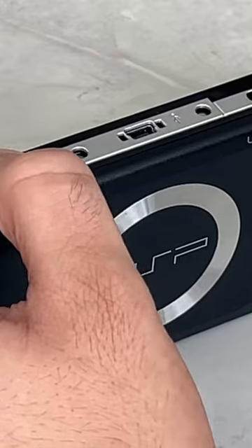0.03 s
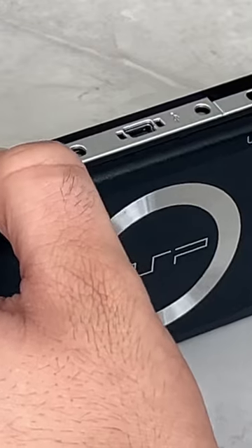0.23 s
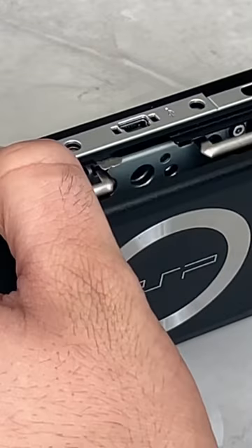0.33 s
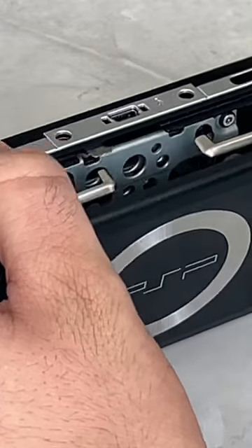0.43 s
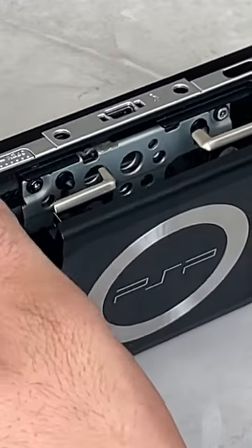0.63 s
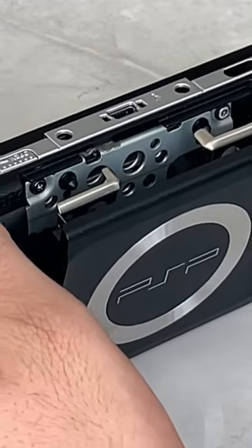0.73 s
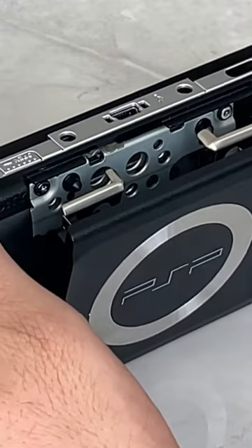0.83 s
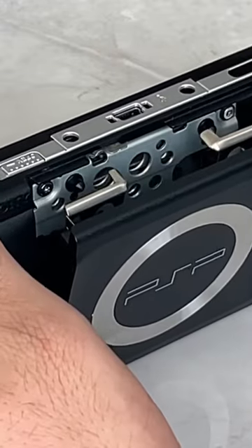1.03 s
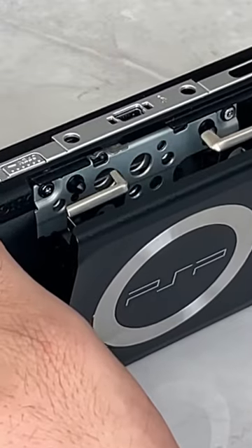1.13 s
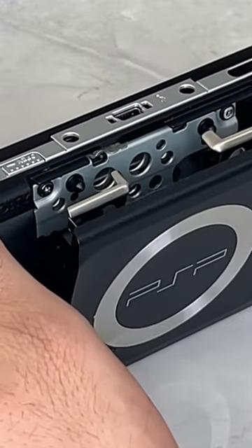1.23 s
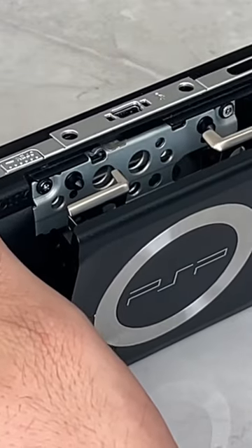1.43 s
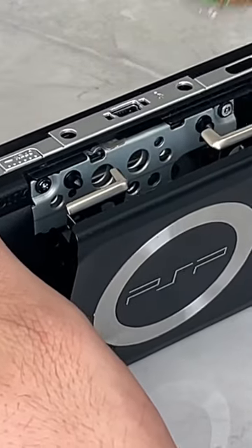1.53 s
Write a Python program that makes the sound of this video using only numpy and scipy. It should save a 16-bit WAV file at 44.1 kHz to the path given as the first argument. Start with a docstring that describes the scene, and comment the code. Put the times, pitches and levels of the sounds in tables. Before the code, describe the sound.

A handheld console's plastic disc door clicks open, close by in a small, live room. A soft thumb scuff at 0.1 seconds leads to the catch cracking free at about 0.2, with a quick clatter and light thuds. The door snaps sharply against its stop at 0.4. From 0.9 to 1.5 seconds, loose parts tick and rub faintly with a slight metallic ring, over a low room rumble.

```python
"""Unlatching a console's disc door

Close by in a small, live room, a faint dull sound dies away, then a thumb scuffs the slider of a handheld
console and the catch cracks free. The sprung plastic door chatters and thuds as it swings out, then snaps
against its stop; these impacts excite the damped modes of panel, case and stop. Afterwards loose parts
tick and rub as the hand shifts the case, ringing the metal disc holder, over a low room rumble."""
import sys
import numpy as np
from scipy import signal
from scipy.fft import rfft, irfft
from scipy.io import wavfile

SR = 44100
rng = np.random.default_rng(int(sys.argv[2]) if len(sys.argv) > 2 else 0)


def transcribe(signal):
    """Save signal, clipped to [-1, 1], as a 16-bit WAV file at the path in sys.argv[1]."""
    frames = np.atleast_2d(signal).T
    limited = np.clip(frames, -1, 1)
    pcm = np.round(limited * 32767).astype(np.int16)
    wavfile.write(sys.argv[1], SR, pcm)


N = 70560
T = np.arange(N) / SR
HZ = np.maximum(np.fft.rfftfreq(2 * N, 1 / SR), 1)

# modes of the door panel: (frequency [Hz], level [dB], t60 [s])
PANEL_MODES = [(536, -31, .22), (902, -26.5, 0.13), (1103, -25, 0.027), (1143.6, -30.5, 0.15),
               (1442, -28.5, .19), (1482, -31, .12), (1648, -33.5, .22), (1906, -39.5, 0.11),
               (2102, -42.5, 0.6), (2680, -36.5, 0.12), (2870, -27, 0.049), (4800, -27, 0.027),
               (8080, -22, 0.045)]


def from_db(db):
    """Amplitude ratio of a level in decibels."""
    return 10 ** (np.asarray(db) / 20)


def at_hz(table, hz, column=1):
    """Interpolation of a table column on a log-frequency axis."""
    table = np.array(table)
    return np.interp(np.log(hz), np.log(table[:, 0]), table[:, column])


def colour(x, spectrum):
    """Minimum-phase filter: folding the cepstrum onto positive time makes the response causal."""
    cepstrum = irfft(np.log(from_db(at_hz(spectrum, HZ))))
    cepstrum[1:N] *= 2
    cepstrum[N + 1:] = 0
    return irfft(rfft(x, 2 * N) * np.exp(rfft(cepstrum)))[..., :N]


def soften(x, hz, order=1):
    """Low-pass filter: the softer a contact, the lower its cutoff."""
    return signal.sosfilt(signal.butter(order, hz, fs=SR, output="sos"), x + 1e-18)


def centred(x, hz, spread=1.144):
    """Band-pass filter: a small contact has its energy around one pitch."""
    band = signal.butter(1, [hz / spread, hz * spread], "band", fs=SR, output="sos")
    return signal.sosfilt(band, x + 1e-18)


def ring(force, modes):
    """Modal superposition: each mode answers the force as a damped oscillator."""
    out = np.zeros(N)
    for hz, db, t60 in modes:
        radius, angle = from_db(-60 / (t60 * SR)), 2 * np.pi * hz / SR
        feedback = [1, -2 * radius * np.cos(angle), radius * radius]
        out += from_db(db) * signal.lfilter([0, np.sin(angle)], feedback, force + 1e-18)
    return out


def decay(start, t60):
    """Exponential decay from a sudden onset, falling 60 dB in t60 seconds."""
    return (T >= start) * np.exp(-np.log(1000) * np.clip((T - start) / t60, 0, 10))


def impulses(rows):
    """Ideal impacts: one impulse for each time and level."""
    out = np.zeros(N)
    for start, db in rows:
        out[int(start * SR)] += from_db(db)
    return out


def contacts(rows, t60, grit):
    """Rough impacts: each is an impulse and a decaying crunch of noise, low-passed together."""
    out = np.zeros(N)
    for start, db, hz in rows:
        crunch = from_db(db) * grit * decay(start, t60) * rng.standard_normal(N)
        out += soften(impulses([(start, db)]) + crunch, hz)
    return out


def grains(per_s):
    """Shot noise: tiny impacts of random time and size."""
    return (rng.random(N) < per_s / SR) * rng.standard_normal(N)


def stereo_noise(coherence):
    """Partly coherent white noise: the mid-side balance sets how alike left and right are."""
    mid, side = rfft(rng.standard_normal((2, 2 * N)))
    common = np.sqrt((1 + coherence) / 2) * mid
    opposed = np.sqrt((1 - coherence) / 2) * side * [[1], [-1]]
    return irfft(common + opposed)[:, :N]


def room_rumble():
    """Stationary background noise: a low rumble with a faint hiss."""
    # noise spectrum: (frequency [Hz], relative level [dB])
    spectrum = [(25, -6), (50, -3.5), (90, 4), (125, -3), (170, -12.5), (300, -16.5), (600, -20.5),
                (1000, -34), (1700, -47), (4000, -52), (8500, -56.5), (10500, -56.5), (12500, -65.5),
                (14000, -69), (16000, -64)]
    # likeness of left and right: (frequency [Hz], coherence [0-1])
    coherence = [(60, 1), (130, 0.94), (300, 0.66), (700, 0), (3000, 1)]
    noise = colour(stereo_noise(at_hz(coherence, HZ)), spectrum)
    noise = soften(noise, hz=13200, order=8)
    return from_db(-50.5) * noise / noise.std()


def dull_sound_and_scuffs():
    """Low-passed bursts: a faint dull sound dies away at the start, then the thumb scuffs the slider."""
    # the opening dull sound, then the thumb's scuffs: (time [s], level [dB], cutoff [Hz])
    bursts = [(.002, -47.5, 1800), (.0885, -46.5, 1760), (.099, -41, 907), (.1045, -42.5, 900),
              (.110, -44, 593)]
    # response to a burst: (frequency [Hz], gain [dB])
    response = [(60, -4), (300, 16), (500, 1.5), (1400, 2), (2500, -11.5), (5000, -9.5), (12000, -23)]
    return colour(contacts(bursts, t60=0.043, grit=0.95), response)


def catch_release():
    """Impact excitation: knocks and dying chatter sound through the door; the knocks ring its panel."""
    # the catch lets go and the door knocks in its guides: (time [s], level [dB], cutoff [Hz])
    knocks = [(0.2218, -31.5, 1000), (0.228, -19, 14000), (.2294, -18, 6000), (.2346, -16, 2870),
              (.2392, -24.5, 14000), (.2418, -27.5, 12000), (0.2509, -18.5, 3030), (.2642, -23, 6000),
              (0.2853, -28.5, 4000), (.2885, -28.5, 4500), (0.2961, -34, 4000), (.3025, -38, 14000),
              (0.3197, -28.5, 1800), (.3335, -39, 12000), (.3550, -35, 2800), (0.395, -36, 2800)]
    # response of the door to a knock: (frequency [Hz], gain [dB])
    response = [(30, -27), (100, -5), (350, 7), (700, 4.5), (1150, 15), (1650, 12), (2200, 6), (3100, 11),
                (5000, 4.5), (8000, 7.5), (10000, 5), (13000, 2.5), (15500, 7)]
    chatter = from_db(-26) * decay(start=0.231, t60=0.27) * grains(per_s=1200)
    clatter = colour(contacts(knocks, t60=0.017, grit=0.31) + chatter, response)
    force = sum(soften(impulses([(start, db)]), hz) for start, db, hz in knocks)
    return clatter + ring(force, PANEL_MODES)


def case_thuds():
    """Soft blows drive the low modes of the case; the deep bass beneath them is cut away."""
    # the swinging door shakes the case: (time [s], level [dB])
    blows = [(.2408, -35.5), (.2455, -30.5), (.2498, -30.5), (.2636, -29), (.2702, -33.5), (.2945, -33.5)]
    # modes of the case: (frequency [Hz], level [dB], t60 [s])
    modes = [(172, -4, 0.1), (199, -12.5, 0.23), (229.8, -5.5, 0.06), (267.6, -6, 0.078), (346.6, -17, .15),
             (424, -22.5, 0.28)]
    vibration = ring(soften(impulses(blows), hz=600), modes)
    bass_cut = signal.butter(2, 120, "high", fs=SR, output="sos")
    return signal.sosfilt(bass_cut, vibration)


def door_stop():
    """A hard impact is broadband: returns the crack with the panel's ring, and the stop's brief ring."""
    # the door meets its stop and rebounds: (time [s], level [dB])
    impacts = [(.4182, -30.5), (.4191, -20), (.4199, -32.5), (.4262, -32)]
    # spectrum of the crack: (frequency [Hz], gain [dB])
    spectrum = [(100, -25), (600, -15.5), (1000, -17.5), (1650, 4), (2200, -1.5), (3300, 1.5), (5000, 1),
                (7600, 2), (10000, 1.5), (13000, -7), (15500, -1.5)]
    # modes of the stiff parts at the stop: (frequency [Hz], level [dB], t60 [s])
    stop_modes = [(1510, -50, .02), (2550, -45.5, .008), (3450, -11.5, .009), (4100, -25.5, .004),
                  (5010, -19, .006), (6220, -6, .004), (7120, -9.5, 0.015), (7220, -7, .005),
                  (8850, -14, .007), (10920, -1, .005), (11700, -19, .004), (15400, -4.5, .004)]
    envelope = sum(from_db(db - 4.5) * decay(start, t60=0.016) for start, db in impacts)
    crack = colour(envelope * rng.standard_normal(N), spectrum)
    force = impulses(impacts)
    panel = from_db(-10) * ring(force, PANEL_MODES)
    return crack + panel, ring(force, stop_modes)


def tick(start, db, hz, t60, rise_s=0.0022):
    """A light impact: a decaying burst of band-limited noise with a soft onset."""
    onset = np.clip((T - start) / rise_s, 0, 1)
    return centred(from_db(db) * onset * decay(start, t60) * rng.standard_normal(N), hz)


def rub(start, duration, db, hz):
    """Sliding friction: a swell of tiny random impacts."""
    swell = np.sin(np.pi * np.clip((T - start) / duration, 0, 1))
    return centred(from_db(db) * swell * grains(per_s=1700), hz)


def loose_parts():
    """Forced vibration: ticks and rubs sound directly and through the disc holder's resonances."""
    # loose parts tick in the hand: (time [s], level [dB], centre frequency [Hz], t60 [s])
    ticks = [(0.9106, -56.5, 3020, 0.031), (0.9155, -53.5, 9150, 0.016), (0.932, -64, 2930, 0.038),
             (0.965, -62.5, 3100, 0.014), (0.983, -59, 2800, 0.0096), (1.064, -61.5, 8040, 0.018),
             (1.071, -58.5, 8100, 0.015), (1.129, -51, 5830, 0.018), (1.149, -63, 6400, 0.0092),
             (1.183, -52.5, 3770, 0.011), (1.197, -51.5, 2600, 0.0085), (1.245, -60, 5900, 0.013),
             (1.262, -59, 8000, 0.015), (1.2937, -54.5, 2740, 0.035), (1.304, -58, 7200, 0.025),
             (1.3627, -48, 3480, 0.014), (1.4042, -44.5, 3000, 0.0099), (1.4046, -43.5, 8400, 0.0098),
             (1.422, -67, 8600, 0.024), (1.438, -54.5, 3040, 0.016), (1.4395, -54, 8500, 0.01),
             (1.4556, -51, 3300, 0.011), (1.495, -53.5, 3430, 0.018), (1.5431, -49.5, 3420, 0.015)]
    # parts slide over each other: (time [s], duration [s], level [dB], centre frequency [Hz])
    rubs = [(0.917, 0.044, -60.5, 3500), (1.045, 0.046, -60, 2540), (1.269, 0.061, -56, 3250),
            (1.1, 0.046, -45, 5000), (1.08, 0.46, -71, 4100)]
    # modes of the metal disc holder: (frequency [Hz], level [dB], t60 [s])
    holder_modes = [(2320, -21, 0.011), (2650, -19, 0.0087), (3097, -20, 0.021), (3917, -21.5, 0.027),
                    (5865, -22, 0.012), (7610, -20.5, 0.015), (7880, -18.5, 0.01), (8110, -19.5, 0.011)]
    force = sum(tick(*row) for row in ticks) + sum(rub(*row) for row in rubs)
    return soften(ring(force, holder_modes) + from_db(-5.5) * force, hz=9400, order=4)


def reverberation(x, delay_s=0.0018, build_s=0.008):
    """Dense reflections build up, then decay exponentially at each band's own rate."""
    # reverberant field: (frequency [Hz], level [dB], t60 [s], left-right coherence [0-1])
    bands = [(150, -8.5, .4, 1), (350, -3.5, 0.49, 0.87), (700, -3, 0.17, 0.23), (1610, -4, 0.59, 0.39),
             (3100, -5, 0.41, 1), (5000, -8.5, 0.38, 1), (7450, -3, 0.28, 1), (11000, -5, 0.21, 0.9),
             (15500, -10.5, .25, .8)]
    noise_spectrum = rfft(stereo_noise(at_hz(bands, HZ, column=3)), 2 * N)
    log_centres = np.log([row[0] for row in bands])
    tail = np.zeros((2, N))
    for (_, db, t60, _), share in zip(bands, np.eye(len(bands))):
        band = irfft(noise_spectrum * np.interp(np.log(HZ), log_centres, share))[:, :N]
        unit_energy = np.sqrt(2 * np.log(1000) / (t60 * SR))
        tail += band * from_db(db) * decay(0, t60) * unit_energy
    build_up = np.clip((T - delay_s) / build_s, 0, 1)
    return signal.fftconvolve(x[None], tail * build_up, axes=1)[:, :N]


def scene():
    """Superposition of direct sound, reverberation and rumble; the stop's ring is mostly direct."""
    snap, stop_ring = door_stop()
    direct = dull_sound_and_scuffs() + catch_release() + case_thuds() + snap + loose_parts()
    reflections = reverberation(direct + from_db(-13) * stop_ring)
    return direct + stop_ring + reflections + room_rumble()


def record(dry):
    """Phase shift between two microphone ports: the left lags most in the treble; the top is cut off."""
    # phase lead of the left port: (frequency [Hz], phase [rad])
    port_phase = [(100, 0), (600, -.2), (1700, .1), (3300, -.65), (5000, -.2), (8600, -.15)]
    lag_s, lag_above_hz, cutoff_hz = 0.000285, 8600, 15800
    lead = at_hz(port_phase, HZ) - 2 * np.pi * lag_s * np.maximum(HZ - lag_above_hz, 0)
    mirrored = np.hstack([dry, dry[:, ::-1]])  # joins its own start without a click
    at_ports = irfft(rfft(mirrored) * np.exp(0.5j * lead * [[1], [-1]]))[:, :N]
    low_pass = signal.ellip(8, 0.3, 80, cutoff_hz, fs=SR, output="sos")
    return signal.sosfilt(low_pass, at_ports)


dry = scene()
out = record(dry)
transcribe(out)
```